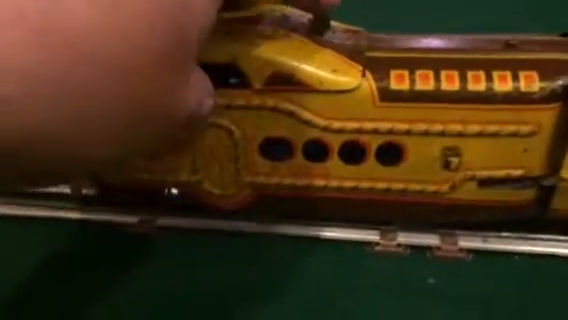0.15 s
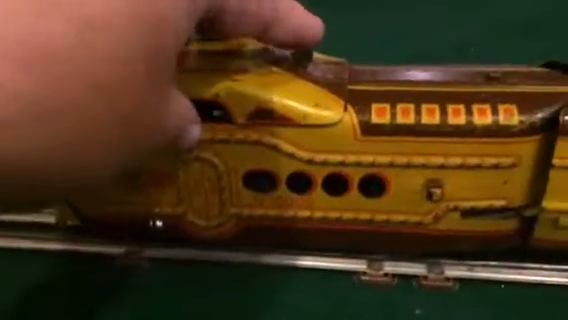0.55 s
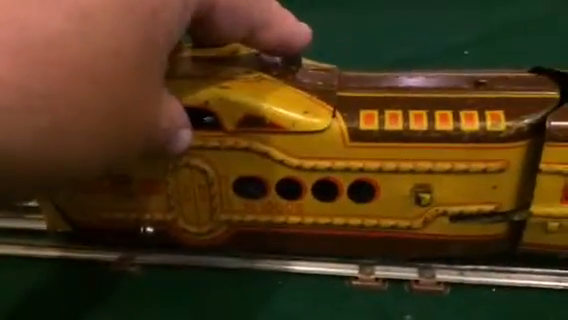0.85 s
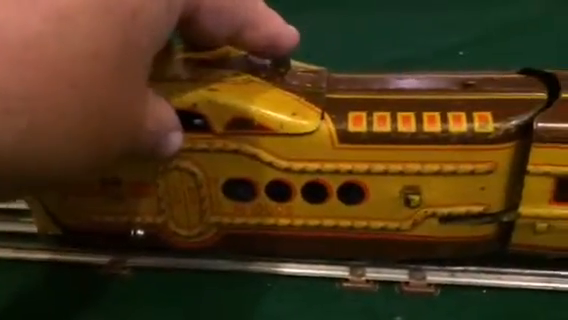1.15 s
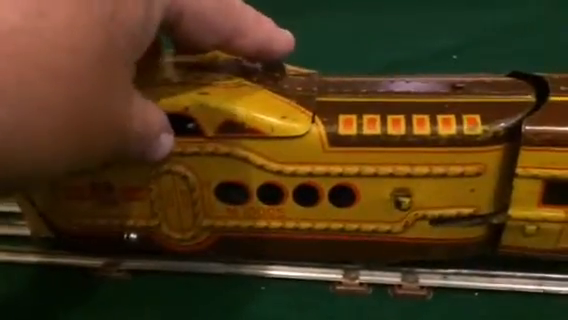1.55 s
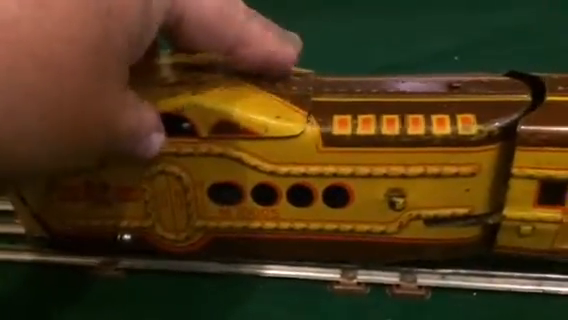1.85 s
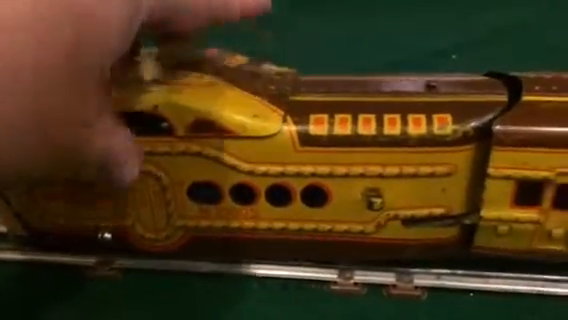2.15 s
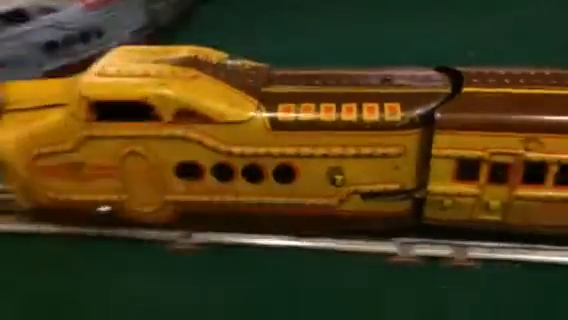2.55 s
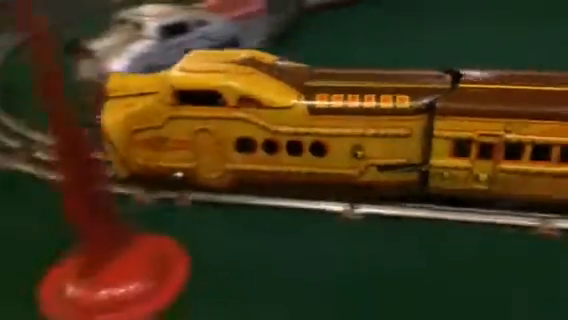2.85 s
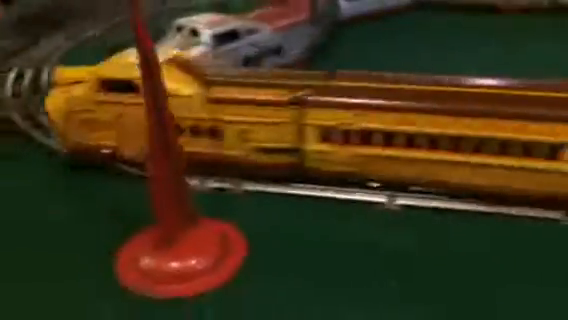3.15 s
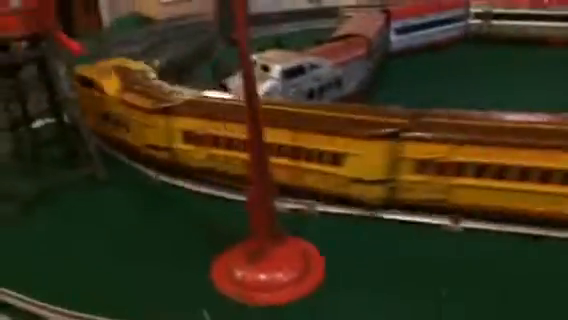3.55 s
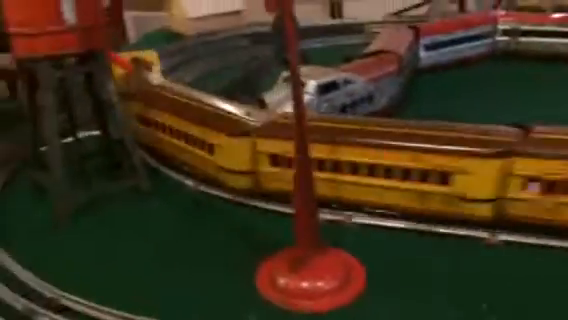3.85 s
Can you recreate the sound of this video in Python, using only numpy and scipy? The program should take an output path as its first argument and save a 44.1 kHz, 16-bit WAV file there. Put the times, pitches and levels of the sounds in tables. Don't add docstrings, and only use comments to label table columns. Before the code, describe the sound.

A wind-up tin train sits nearly silent with faint creaks, its brake lever snaps sharply, then after a brief lull it ticks and clatters off along tin rails; close microphone, quiet small room with low hum.

```python
import sys
import numpy as np
from scipy import signal
from scipy.fft import rfft, irfft
from scipy.io import wavfile
from scipy.ndimage import map_coordinates

SR = 44100
rng = np.random.default_rng(int(sys.argv[2]) if len(sys.argv) > 2 else 0)


def gain_from_db(level_db):
    decades = np.asarray(level_db, float) / 20
    return 10 ** decades


def to_wav(sig):
    pcm = np.clip(np.atleast_2d(sig), -1, 1) * 32767
    pcm = np.round(pcm).astype(np.int16)
    wavfile.write(sys.argv[1], SR, pcm.T)


N = 176400
RING_SAMPLES = 4096


def unit(x):
    return x / np.sqrt(np.mean(x ** 2) + 1e-30)


def unit_energy(x):
    return x / np.linalg.norm(x)


def along(points, hz):
    f, value = np.transpose(points)
    return np.interp(np.log(hz + 1), np.log(f + 1), value)


def wobble(rate):
    knots = rng.standard_normal(int(N * rate / SR) + 4)
    return map_coordinates(knots, [np.arange(N) * rate / SR])


def coloured(points, size):
    closed = [(points[0][0] * .7, -90)] + list(points)
    gain = gain_from_db(along(closed, np.fft.rfftfreq(size, 1 / SR)))
    return unit(irfft(rfft(rng.standard_normal(size)) * gain, size))


# f/Hz, level/(dB per Hz)
AIR_SPECTRUM = [(200, -9), (330, -6), (700, -9.5), (1300, -19.5), (2200, -20.5), (3500, -18), (8500, -32.5),
                (15500, -36.5)]


def air_noise():
    return gain_from_db(-65.5 + 0.6 * wobble(4.8)) * coloured(AIR_SPECTRUM, size=N)


# f/Hz, level/(dB per Hz)
LOW_SPECTRUM = [(12, -72), (20, -38), (48, -7), (70, -1), (86, -16), (102, -9), (124, 0), (176, -13),
                (300, -20), (390, -61), (660, -120)]


def low_rumble():
    spectrum = LOW_SPECTRUM + [(400, -60), (900, -110)]
    return coloured(spectrum, size=N) * gain_from_db(-51.5 - 2 + 0.61 * wobble(6.83))


# f/Hz, level/dB (peak), wander/Hz
HUM = [(59, -56.5, 1.54), (120.7, -58, 3.02)]


def mains_hum():
    t = np.arange(N) / SR
    hum = np.zeros(N)
    for hz, db, wander in HUM:
        level = gain_from_db(db - 0.5 + 0.64 * wobble(6.0))
        cycles = hz * t + np.cumsum(wander * wobble(11.0)) / SR
        hum += level * np.sin(2 * np.pi * cycles)
    return hum


# multiple of the rotation tone, level/dB (peak)
MOTOR_ORDERS = [(2, -94), (3, -91), (4, -87), (5, -99), (6, -90), (7, -100)]


def motor():
    motor_hz, wander_hz = 1118, 4.5
    turn = 2 * np.pi * np.cumsum(motor_hz + wander_hz * wobble(66)) / SR
    return sum(gain_from_db(db + 6.0) * np.sin(order * turn) for order, db in MOTOR_ORDERS)


# f/Hz, level/dB, width/Hz
WHINE = [(581, 0, 5), (2980, -7, 300), (3693, -6, 14), (3795, -7, 90)]


def whine():
    f = np.fft.rfftfreq(N, 1 / SR)
    peaks = np.zeros(len(f))
    for hz, db, width in WHINE:
        peaks += gain_from_db(db) / np.sqrt(width) / (1 + (2 * (f - hz) / width) ** 2)
    return gain_from_db(-75.5) * unit(irfft(rfft(rng.standard_normal(N)) * peaks, N))


def background():
    return mains_hum() + motor() + whine() + low_rumble() + air_noise()


# f/Hz, t60/s
ROOM_T60 = [(200, 0.39), (2000, 0.29), (10000, 0.16)]


def room(x):
    hz, t, cells = signal.stft(rng.standard_normal(SR // 2), SR, nperseg=256)
    decay = gain_from_db(-60 * t / along(ROOM_T60, hz)[:, None])
    tail = signal.istft(cells * decay, SR, nperseg=256)[1]
    delayed = np.pad(x, (300, 0))
    return signal.fftconvolve(delayed, unit_energy(tail))[:N]


# t/s, level/dB, f/Hz, width/s
THUMPS = [(2.001, -24, 87, 0.006), (2.006, -37.5, 171, 0.012), (2.025, -31, 92, 0.0044),
          (2.502, -37.5, 103, 0.005), (2.69, -39.5, 90, 0.0091), (2.782, -41.5, 117, 0.02),
          (3.061, -55, 109, 0.006), (3.393, -18.5, 117, 0.0035), (3.3928, -27.5, 295, 0.00041),
          (3.392, -27.5, 765, 0.0014), (3.946, -34, 680, 0.0011)]


def thumps():
    t = np.arange(N) / SR
    out = np.zeros(N)
    for s, db, hz, width in THUMPS:
        swing = np.cos(2 * np.pi * hz * (t - s))
        out += gain_from_db(db) * swing * np.exp(-((t - s) / width) ** 2 / 2)
    return out


def ring(modes, colour, t60, modes_db):
    mode_t60_s, build_up_s = 0.085, 0.00087
    t = np.arange(RING_SAMPLES) / SR
    hz, db = np.transpose(modes)[:, :, None]
    level_luck, pitch_luck = rng.standard_normal((2, len(modes), 1))
    partials = gain_from_db(db + level_luck) * np.sin(2 * np.pi * hz * (1 + 0.0054 * pitch_luck) * t)
    tones = partials.sum(0) * gain_from_db(-60 * t / mode_t60_s)
    wash = coloured(colour, size=len(t)) * gain_from_db(-60 * t / t60) * (1 - np.exp(-t / build_up_s))
    return unit_energy(unit(wash) + gain_from_db(modes_db) * unit(tones))


# f/Hz, level/dB
SHELL_MODES = [(760, -0.5), (885, -13), (1040, -16), (1165, 8), (1390, -16), (1520, 10), (1690, 7),
               (1800, -0.5), (2105, -18)]
RAIL_MODES = [(2610, -6), (2860, 0.5), (3010, 2), (3460, 5.5), (3660, -1), (3870, -1), (4060, 3.5),
              (4690, -2), (5900, -6.5)]
# f/Hz, level/(dB per Hz)
SHELL_WASH = [(300, -40), (520, -15), (800, 2.5), (1100, 1), (1550, 2.5), (2000, -3), (2600, -6),
              (5000, -54)]
RAIL_WASH = [(1500, -9), (2400, -4.5), (3200, 5.5), (4600, -2.5), (5400, -8), (8000, -20), (12000, -37),
             (16000, -58)]
CRACK = [(3000, -20), (6000, 7), (9000, -6), (12000, -11), (15000, -20)]


def tin(hits, rails_db, ring_hz, modes_db, crack_db, focus_db):
    t = np.arange(RING_SAMPLES) / SR
    crack = coloured(CRACK, size=len(t)) * gain_from_db(-60 * t / 0.017)
    focus = np.sin(2 * np.pi * ring_hz * t) * gain_from_db(-60 * t / 0.014)
    shell = ring(SHELL_MODES, SHELL_WASH, 0.077, modes_db)
    rails = ring(RAIL_MODES, RAIL_WASH, 0.033, modes_db) + gain_from_db(crack_db) * unit_energy(crack)
    shell_sound = signal.fftconvolve(hits * gain_from_db(-rails_db / 2), shell)
    panel_sound = signal.fftconvolve(hits * gain_from_db(focus_db + abs(rails_db) / 2), unit_energy(focus))
    return shell_sound + panel_sound + signal.fftconvolve(hits * gain_from_db(rails_db / 2), rails)


def taps(size, per_s, scatter_db):
    chance, side, size_luck = rng.random((3, size))
    strength = gain_from_db(-scatter_db * np.log(size_luck + 0.0075))
    return (chance < per_s / SR) * np.sign(side - .5) * strength


def contacts(rows, modes_db, crack_db):
    taps_per_s, rise_s, first_tap = 1500, .0012, 1.62
    out, t = np.zeros(N + SR), np.arange(RING_SAMPLES) / SR
    for s, db, rails_db, length, ring_hz in rows:
        chatter = unit(taps(len(t), taps_per_s, scatter_db=5)) * np.sqrt(taps_per_s / SR)
        chatter = chatter * np.exp(-t / max(length, .001)) * (1 - np.exp(-t / rise_s))
        chatter[round(rise_s * SR / 2)] = first_tap
        hits = unit_energy(chatter) * np.sqrt(length * SR)
        sound = tin(hits, rails_db, ring_hz, modes_db, crack_db, focus_db=-5.5)
        out[round(s * SR):][:len(sound)] += gain_from_db(db - 11) * sound
    return out[:N]


# t/s, level/dB, rails over shell/dB
CREAKS = [(0.0465, -63, 16), (0.0744, -54, 1), (0.3357, -57.5, -1), (1.26, -63.5, 10), (1.499, -60.5, 2),
          (1.6795, -61, 8), (1.7297, -57, 2), (1.8888, -59.5, -4), (1.919, -61, -9), (2.119, -51, -1),
          (2.2489, -55.5, 11), (2.3012, -61, 5)]


def creaks():
    length_s, ring_hz = 0.017, 1520
    rows = [tuple(row) + (length_s, ring_hz) for row in CREAKS]
    return contacts(rows, modes_db=-3, crack_db=-47.5)


# t/s, level/dB, f/Hz, t60/s
TICKS = [(2.545, -40, 3920, 0.026), (2.672, -30, 1546, 0.04), (2.7462, -32.5, 1630, 0.03),
         (2.9435, -33, 3020, .015), (3.0542, -29, 4400, 0.026), (3.294, -33.5, 1090, .02),
         (3.6643, -26, 3060, 0.015), (3.6652, -30.5, 1630, .015), (3.7298, -33.5, 4910, .025),
         (3.864, -29.5, 1440, .025), (3.9444, -27, 3090, 0.013), (3.9444, -34, 740, 0.062)]
# multiple of f, level/dB
TICK_PARTIALS = [(1, -0.5), (1.13, -13), (.84, -13), (1.52, -20)]


def ticks():
    out, t = np.zeros(N + SR), np.arange(RING_SAMPLES) / SR
    for s, db, hz, t60 in TICKS:
        tones = sum(gain_from_db(level_db) * np.sin(2 * np.pi * k * hz * t) for k, level_db in TICK_PARTIALS)
        out[round(s * SR):][:len(t)] += gain_from_db(db - 60 * t / t60) * tones
    return out[:N]


# t/s, level/dB, rails over
# shell/dB, chatter length/s, strongest ring f/Hz
RATTLE = [(2.032, -33, 8, 0.0044, 2920), (2.04, -36, 0, 0.007, 4000), (2.057, -45, -3, .008, 1570),
          (2.442, -60, -2, 0.0053, 1500), (2.581, -48, -4, .006, 1770), (2.733, -44, 4, 0.0056, 4000),
          (2.894, -48, 5, .006, 4400), (3.078, -32, -5, 0.0034, 1100), (3.094, -37, 11, 0.0051, 4140),
          (3.178, -40.5, 4, 0.0034, 6100), (3.189, -33, -2, .004, 1800), (3.216, -37.5, 5, 0.0043, 6460),
          (3.24, -36, 3, 0.01, 4170), (3.28, -36, -5, .005, 1400), (3.308, -40.5, 5.5, 0.0047, 6930),
          (3.387, -37, 11, .005, 2880), (3.477, -37, 4, 0.0046, 5970), (3.535, -39, -3, .005, 1700),
          (3.553, -39, 8, 0.0068, 6930), (3.577, -40, 7, .006, 8260), (3.643, -39, 2, 0.0036, 1100),
          (3.677, -36, -5, .005, 2300), (3.697, -39, 5, .006, 3400), (3.748, -36, -3, .006, 2900),
          (3.808, -45.5, 6, 0.0045, 7460), (3.8545, -34, 10, .002, 4700), (3.885, -38, 10, .002, 5500),
          (3.927, -33, 8, .002, 3200)]


def rattle():
    return contacts(RATTLE, modes_db=-3, crack_db=-19)


# t/s, level/dB, rails over shell/dB, chatter length/s, strongest ring f/Hz
LEVER = [
    (1.9905, -15.5, 1, 0.0067, 3530),
    (1.9932, -11.5, -3, 0.0038, 2820),
    (1.9966, -7, 4.5, 0.0025, 3960),
    (2.0015, -17.5, -9.5, 0.0033, 1590),
    (2.009, -27, 17, 0.003, 2520),
    (2.016, -36, 7, 0.0063, 3000),
    (2.031, -47, -6, 0.0037, 3130),
    (2.039, -41, -7, 0.0056, 1510),
]


def brake_lever():
    return contacts(LEVER, modes_db=-9.5, crack_db=-7)


# t/s, level/dB, rails over shell/dB, chatter length/s, strongest ring f/Hz
TAKE_UP = [(2.186, -39.5, -2, 0.016, 2600), (2.4915, -42.5, -6.5, 0.0049, 814),
           (2.514, -46.5, 8, 0.019, 1540), (2.545, -37.5, 15.5, 0.0022, 3820),
           (2.626, -39.5, 3, 0.0059, 1490), (2.672, -29, -6.5, 0.0051, 1530),
           (2.681, -33.5, 9, 0.0038, 4430), (2.7455, -29.5, -6.5, 0.01, 1650),
           (2.766, -34.5, -3.5, 0.019, 1750), (2.792, -34, 6, 0.0062, 4070),
           (2.846, -36.5, 10.5, 0.0037, 3600), (2.943, -22.5, 1, 0.005, 2970)]


def take_up():
    return contacts(TAKE_UP, modes_db=-3, crack_db=-47.5)


# t/s, level/dB, rails over shell/dB, chatter length/s, strongest ring f/Hz
JOINTS = [(3.052, -25.5, -2.5, 0.0078, 3640), (3.063, -22.5, 3, 0.0056, 4100),
          (3.118, -32.5, -2, 0.009, 1510), (3.167, -34, 4, 0.015, 1070), (3.363, -28.5, 2, 0.015, 1560),
          (3.374, -21.5, -4.5, 0.0039, 1600), (3.412, -30, 3, 0.005, 3900), (3.459, -30.5, -5, 0.014, 1800),
          (3.549, -42, 11, 0.011, 1570), (3.65, -51, -4, 0.0028, 920), (3.6636, -26, -1, 0.0012, 3130),
          (3.731, -36, 8, 0.028, 4830), (3.859, -30, -4, 0.0092, 1440), (3.946, -37, 3, 0.0011, 3040)]


def rail_joints():
    return contacts(JOINTS, modes_db=-3, crack_db=-47.5)


# t/s, level/dB, rails over shell/dB
ROLL = [(2.3, -70.5, 3), (2.42, -69.5, -4), (2.5, -60, -5), (2.6, -61, -5), (2.72, -54, -1.5),
        (2.8, -62, -10), (2.9, -50.5, -2.5), (3.04, -47, -5.5), (3.2, -43, -5.5), (3.34, -45, -5),
        (3.45, -41.5, -2), (3.52, -46, -3), (3.62, -44, -7.5), (3.7, -44, -7.5), (3.82, -45.5, -3.5),
        (4, -44, -3)]


def rolling():
    let_go_s, take_up_s = 2.24, .09
    place_hold_s, place_stray = .03, .4
    s, db, rails_db = np.transpose(ROLL)
    start = 2 * SR
    t = np.arange(N) / SR
    level_db = np.interp(t, s, db) + .7 * wobble(9) + 1.2 * wobble(45)
    level = gain_from_db(level_db) * np.clip((t - let_go_s) / take_up_s, 0, 1)
    drive = level * unit(taps(N, per_s=1800, scatter_db=3.5))
    tilt_db = np.interp(t, s, rails_db) + 1.3 * wobble(13)
    places = SHELL_MODES[1:] + RAIL_MODES[1:5]
    stray, held = rng.integers(len(places), size=(2, N))
    held_now = held[(t / place_hold_s).astype(int)]
    place = np.where(rng.random(N) < place_stray, stray, held_now)
    out = 0
    for k, (hz, _) in enumerate(places):
        hits = (drive * (place == k))[start:]
        out = out + tin(hits, tilt_db[start:], hz, modes_db=-5.5, crack_db=-33.5, focus_db=-10.5)
    rumble = coloured([(50, -10.0), (110, 1.5), (200, -3.0), (280, -21), (500, -26), (900, -50),
                       (2000, -100)], size=N)
    return np.pad(out, (start, 0))[:N] + gain_from_db(-7.5) * level * rumble


def scene():
    train = creaks() + ticks() + rattle() + brake_lever() + take_up() + rail_joints() + rolling()
    return (train + gain_from_db(-19) * room(train) + thumps() + background())[None]


def top_cut(x):
    return signal.sosfilt(signal.butter(12, 15680, fs=SR, output="sos"), x)


def record(dry):
    top_hz = 15400
    passed = np.fft.rfftfreq(N, 1 / SR) < top_hz
    mix = irfft(rfft(dry) * passed, N)
    return top_cut(mix)


dry = scene()
out = record(dry)
to_wav(out)
```